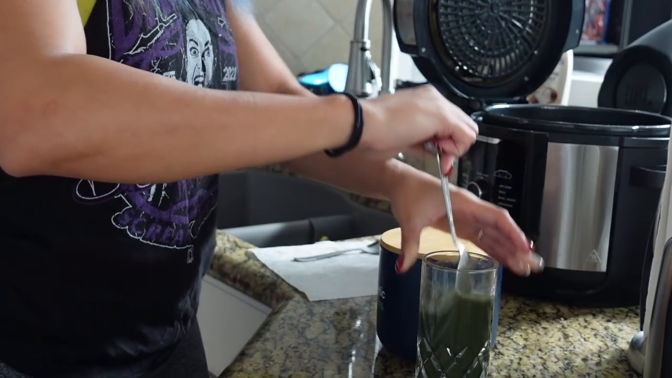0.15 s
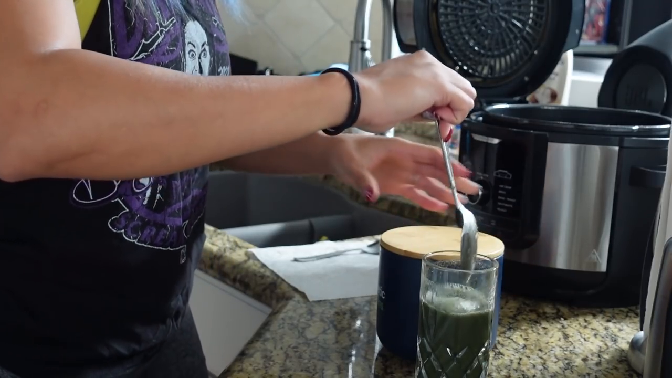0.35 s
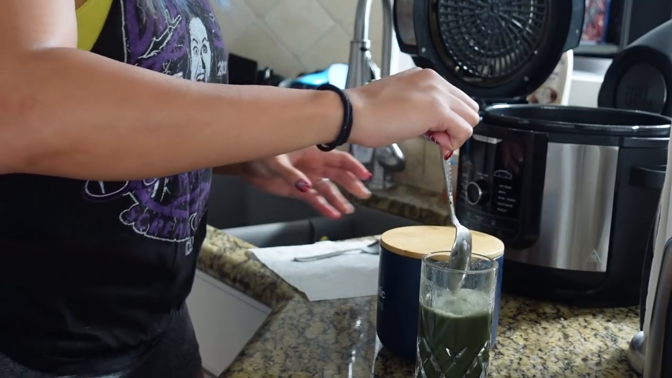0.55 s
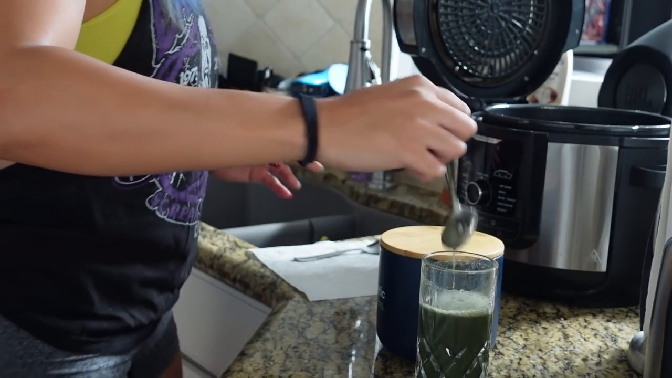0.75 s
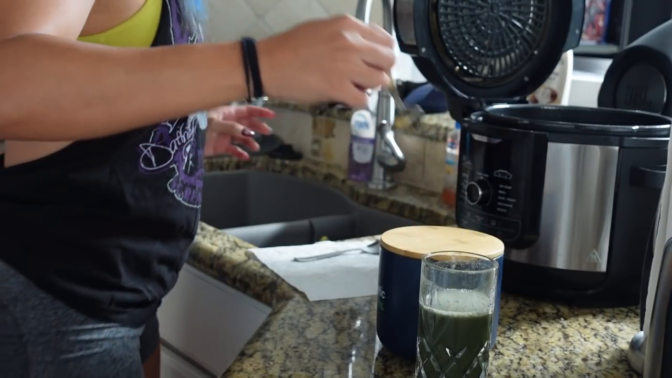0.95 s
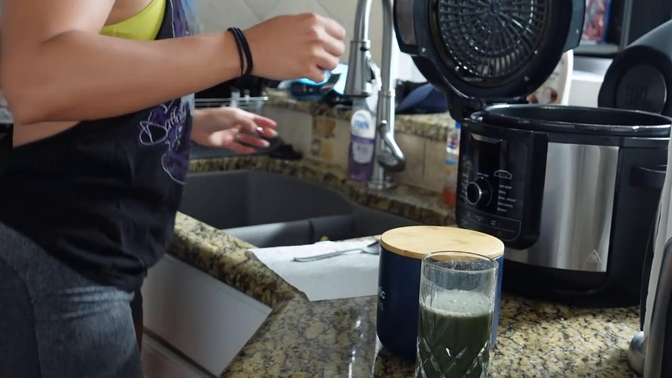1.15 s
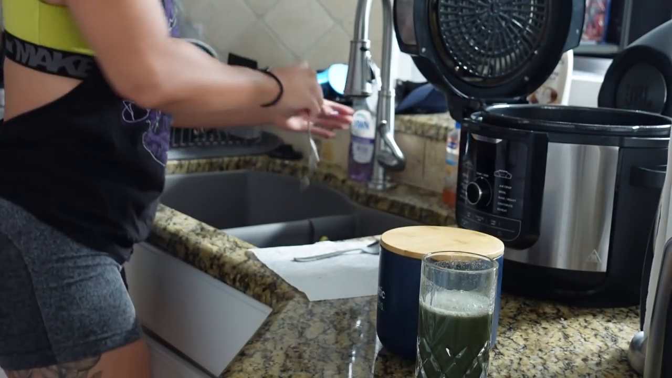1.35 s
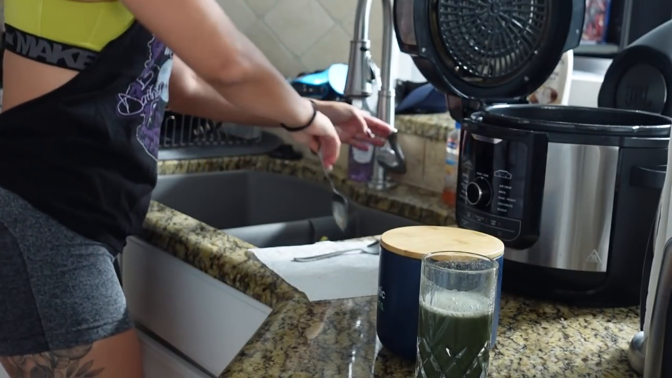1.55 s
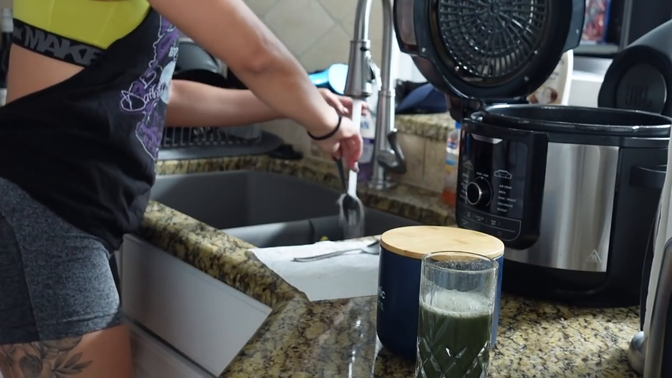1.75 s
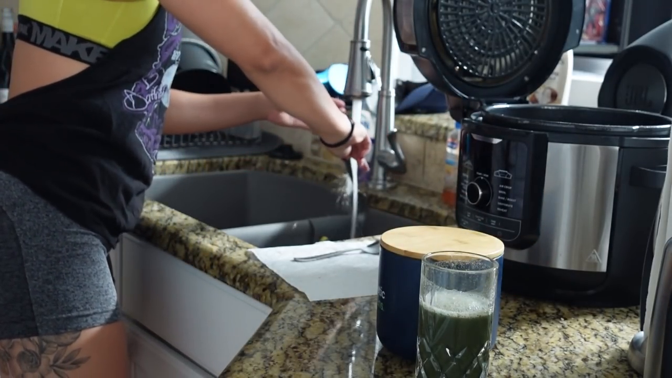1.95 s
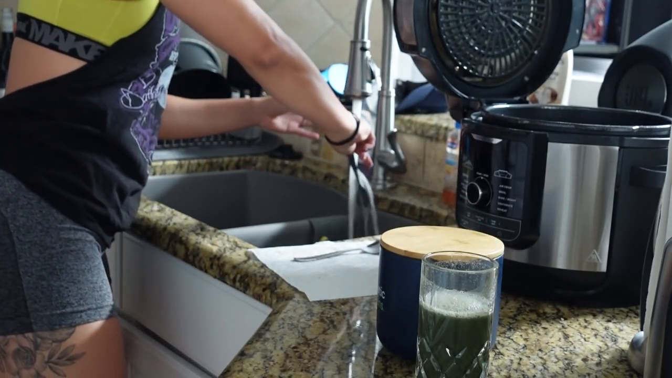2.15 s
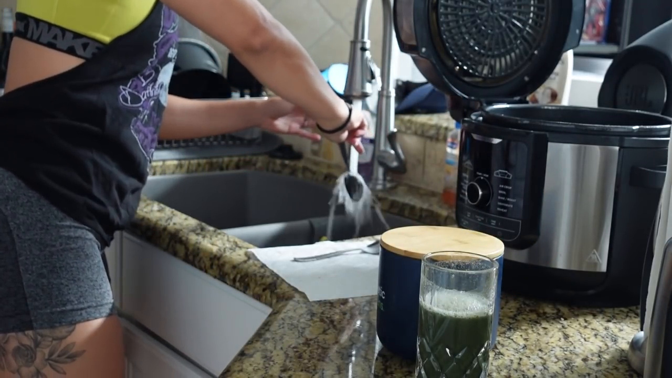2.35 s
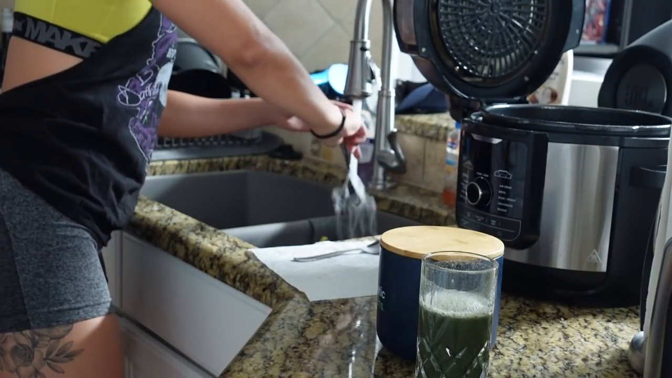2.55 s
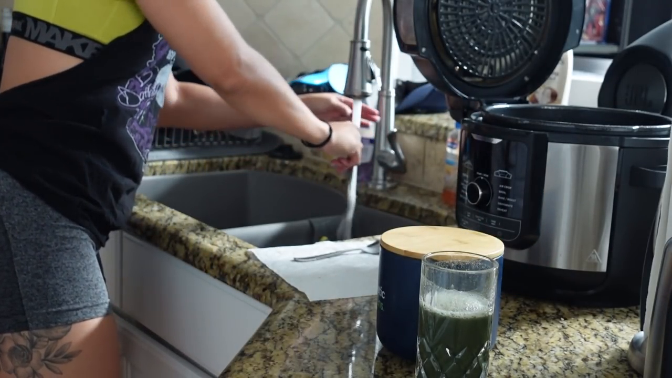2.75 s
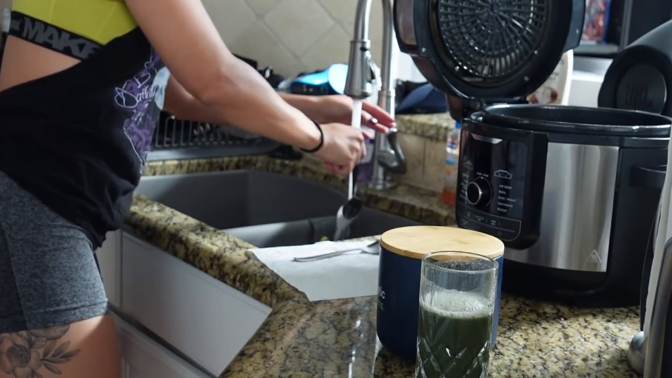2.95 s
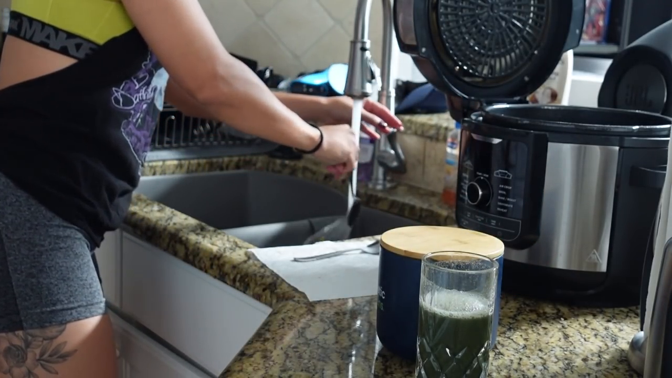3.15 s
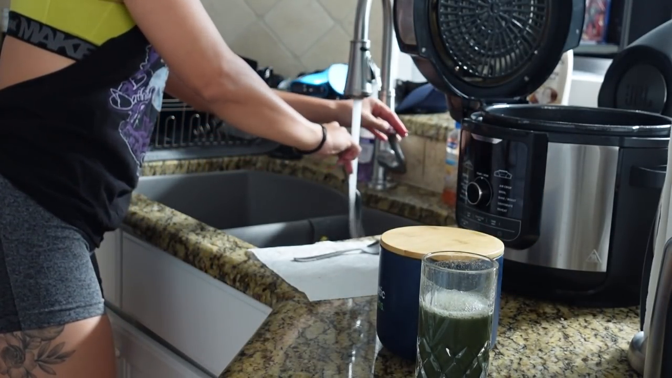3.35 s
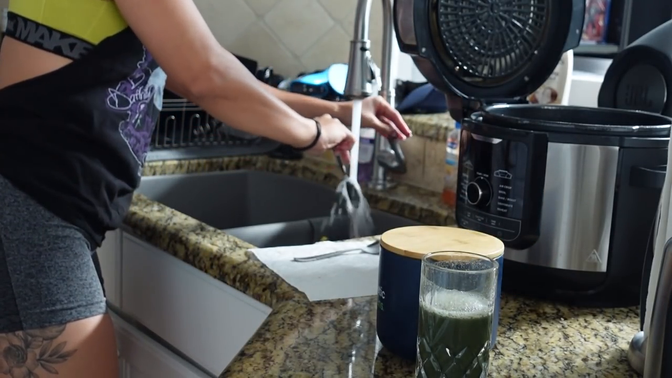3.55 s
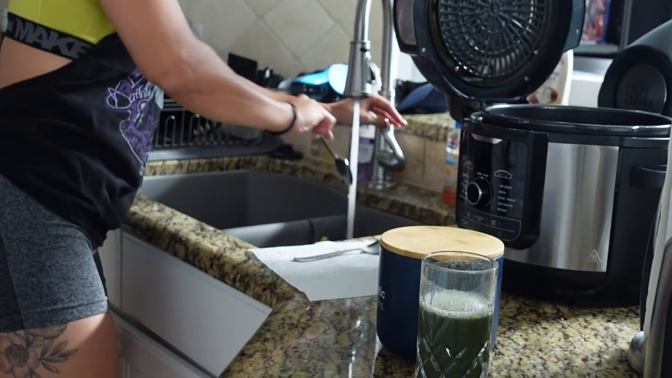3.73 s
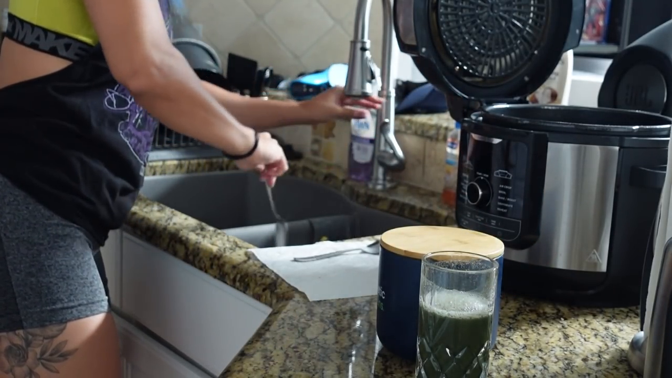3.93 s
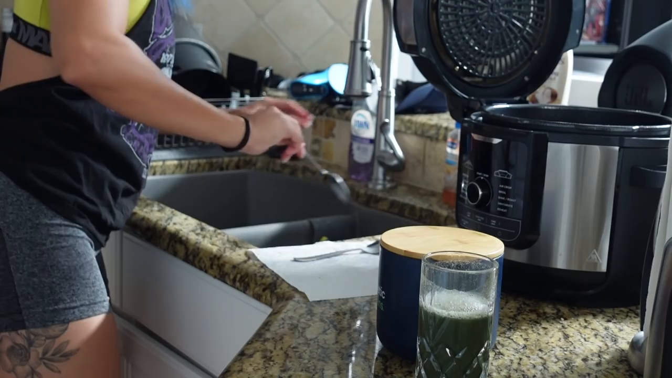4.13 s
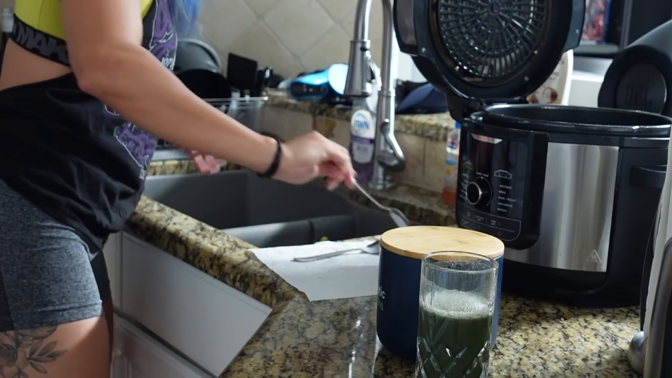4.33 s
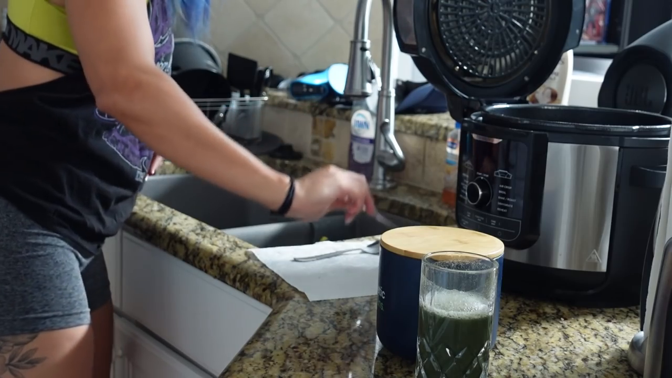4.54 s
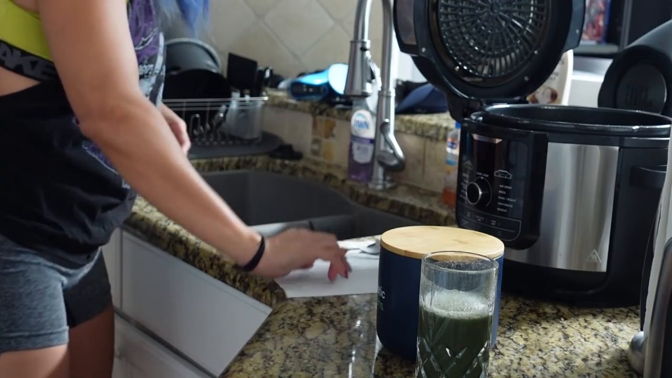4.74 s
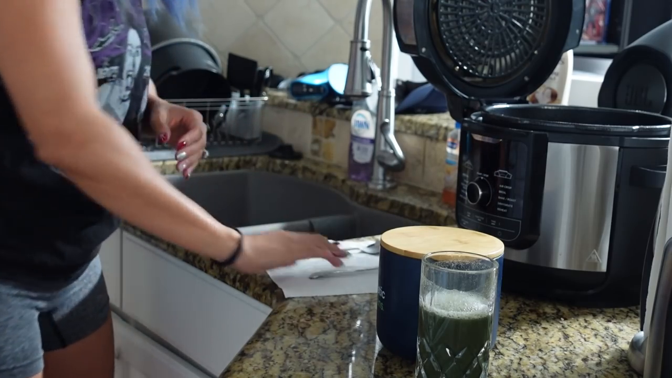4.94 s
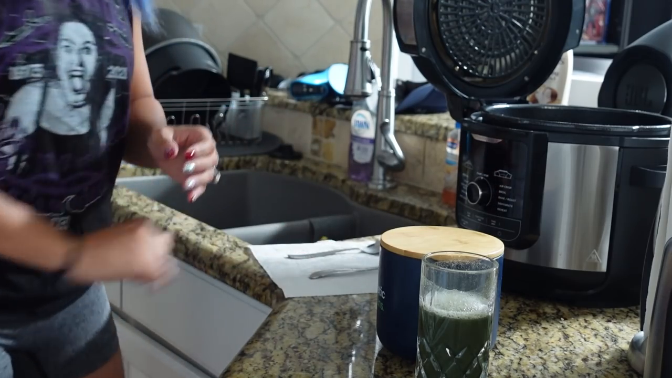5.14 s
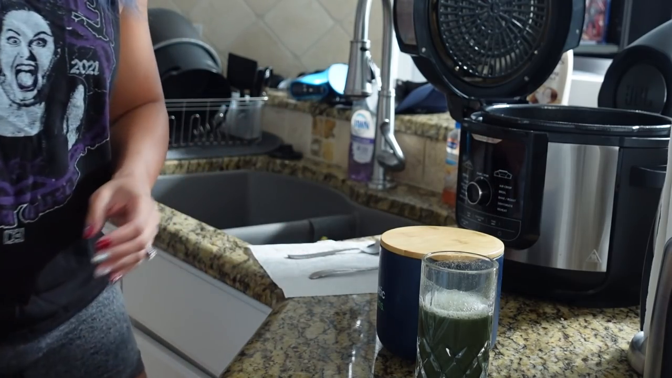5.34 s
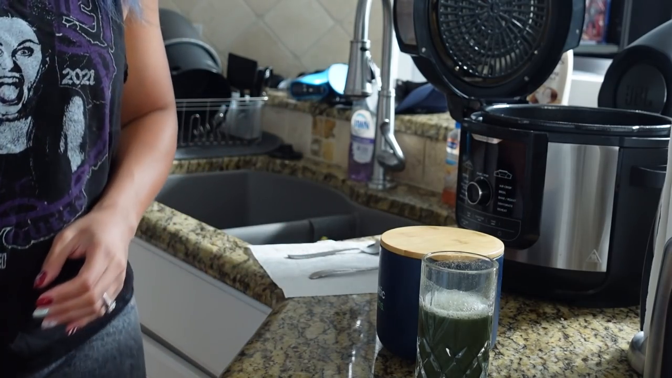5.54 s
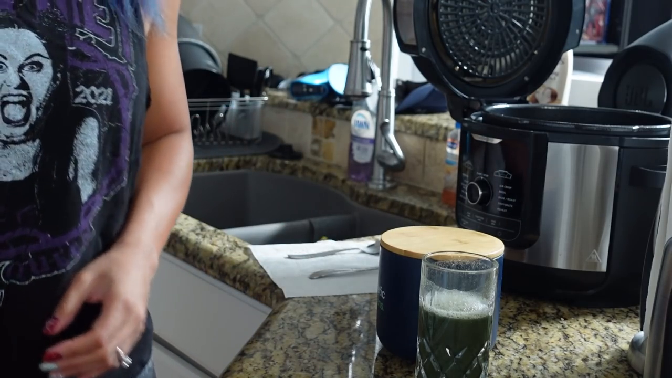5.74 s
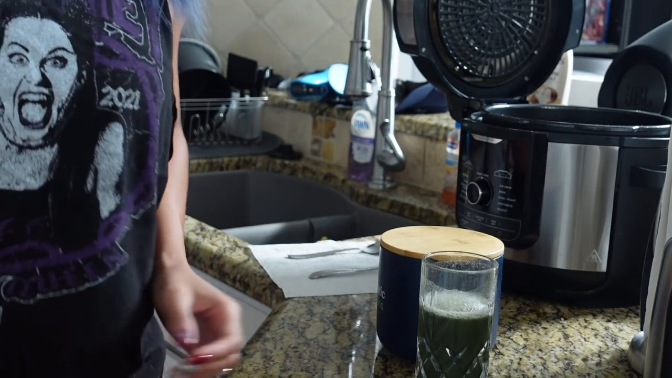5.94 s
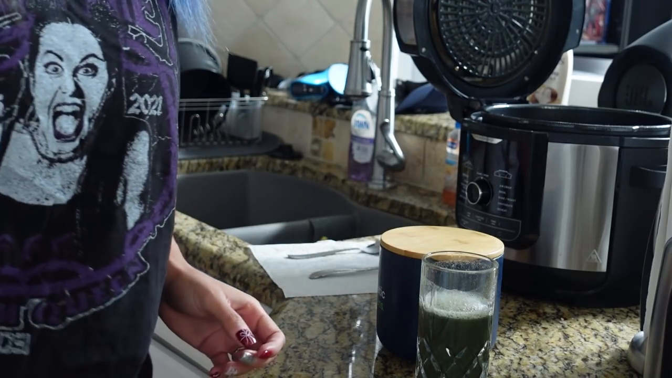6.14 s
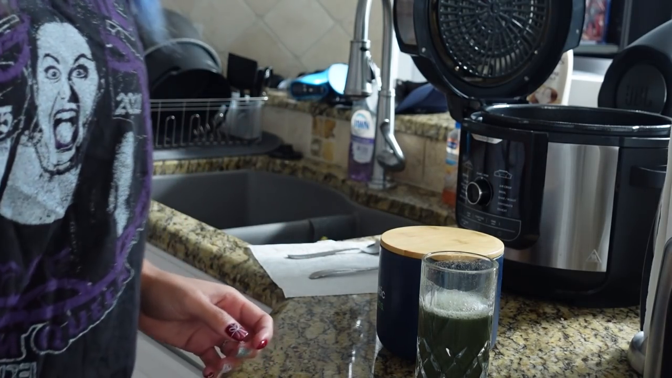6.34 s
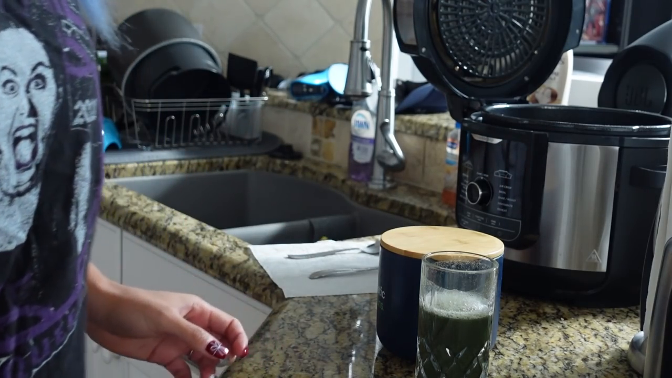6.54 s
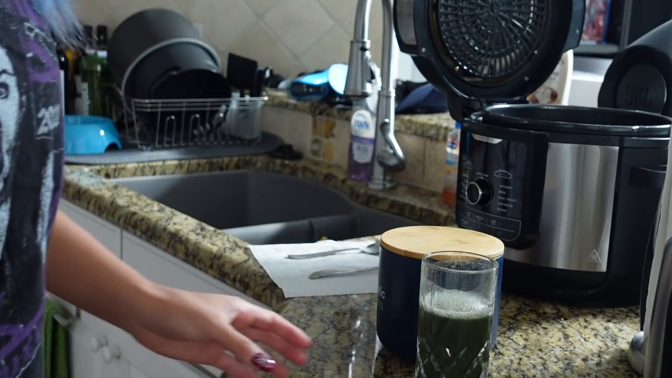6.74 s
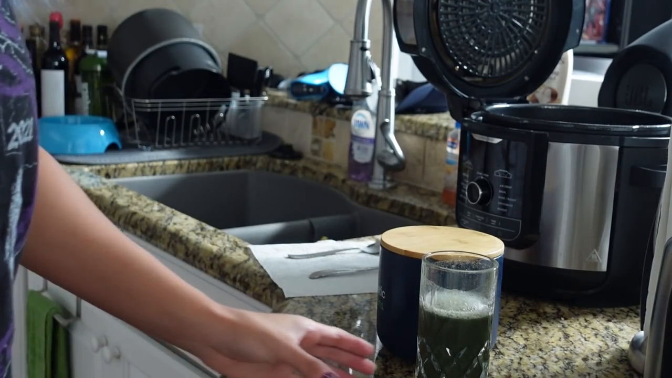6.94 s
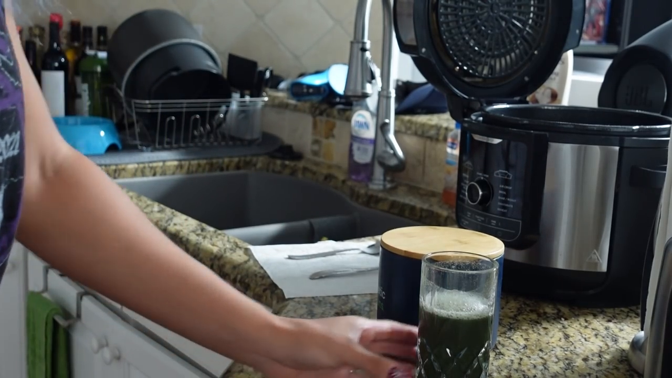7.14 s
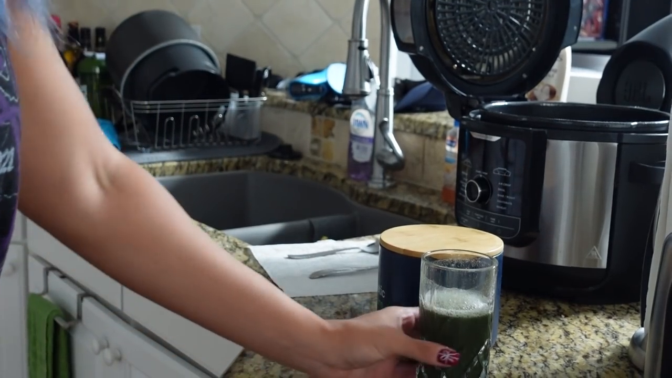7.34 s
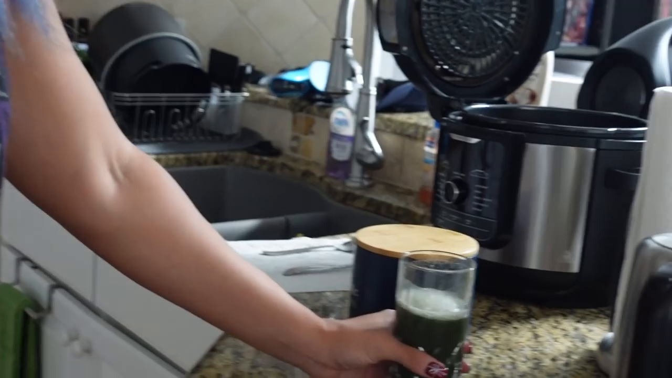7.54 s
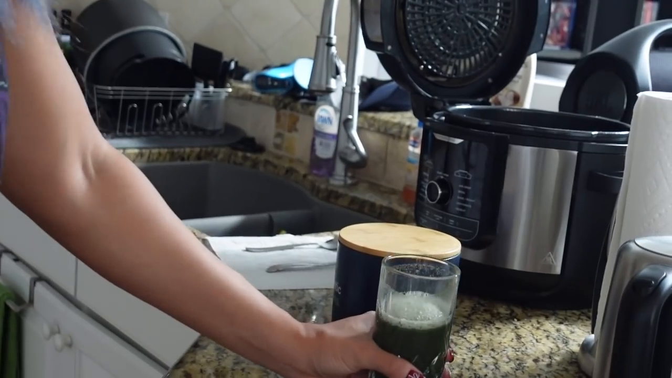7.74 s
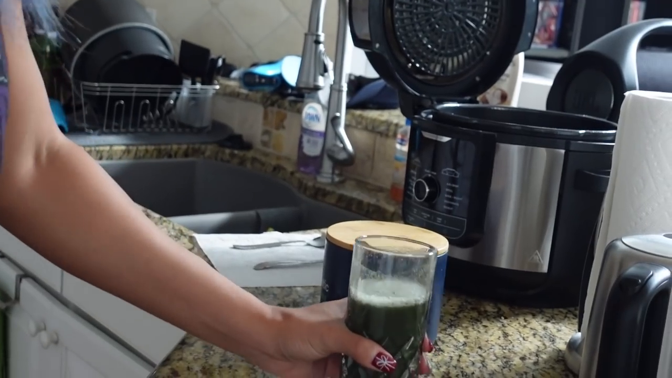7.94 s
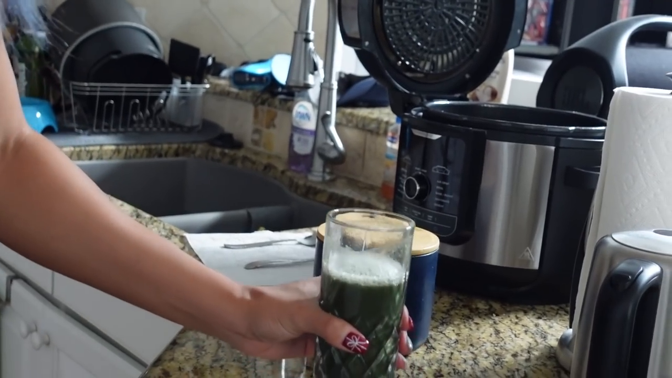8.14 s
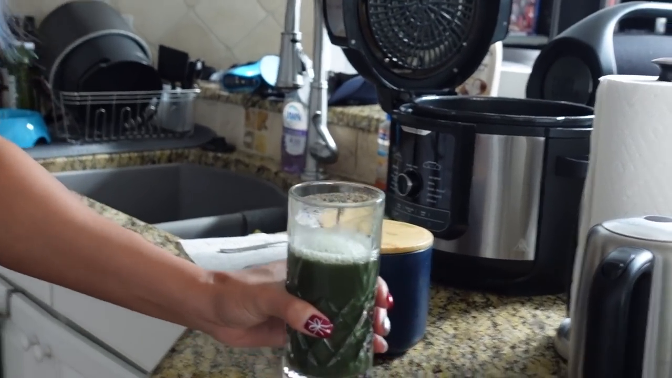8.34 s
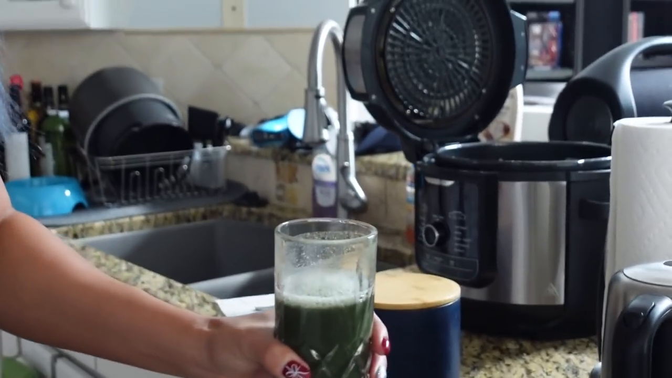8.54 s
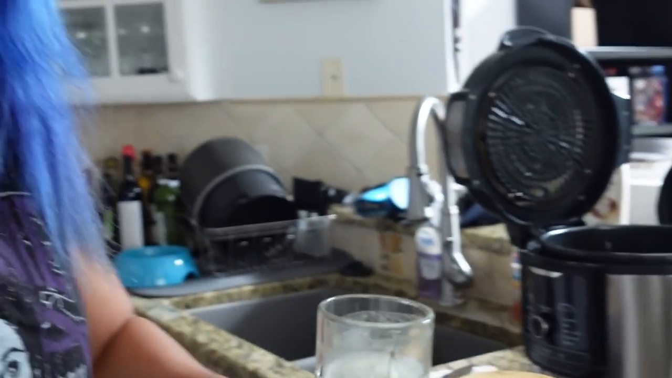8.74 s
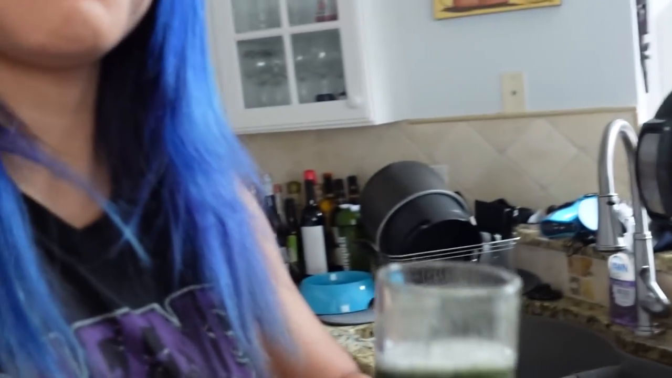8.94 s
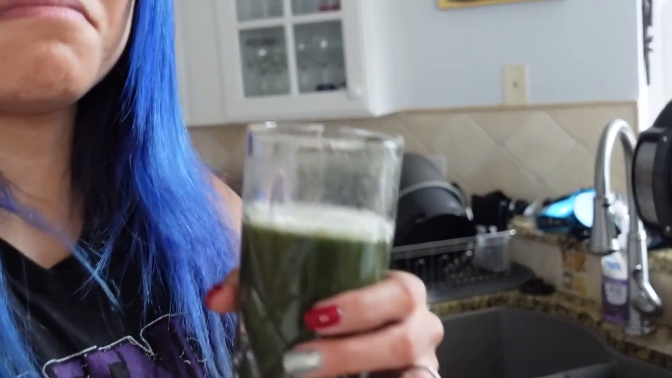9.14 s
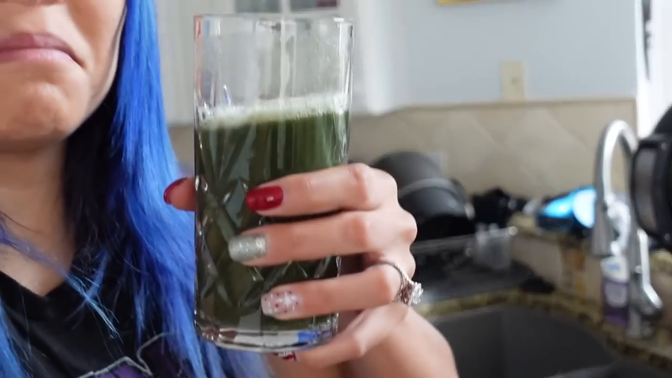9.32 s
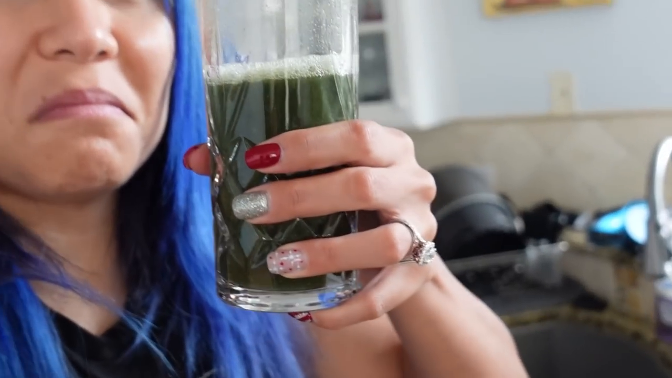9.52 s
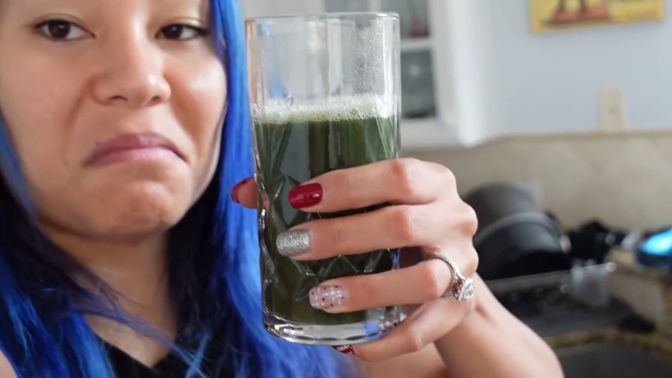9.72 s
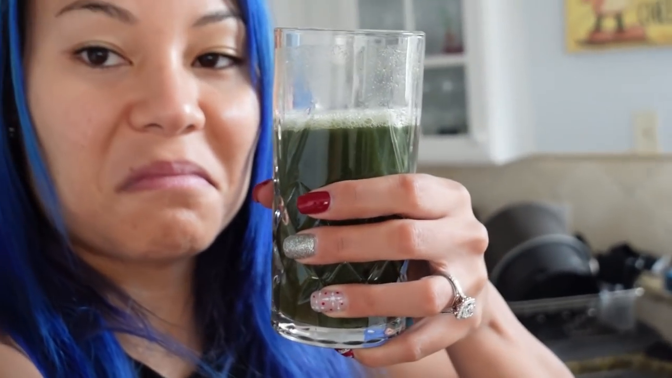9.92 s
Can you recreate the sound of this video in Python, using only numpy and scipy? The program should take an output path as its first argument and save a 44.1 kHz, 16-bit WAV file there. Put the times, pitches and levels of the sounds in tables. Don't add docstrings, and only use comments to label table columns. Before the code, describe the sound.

A spoon clinks three times on a full glass rim, a kitchen tap sprays over it, then it is tapped and laid on the counter.

```python
import sys
import numpy as np
from scipy import signal
from scipy.fft import rfft, irfft
from scipy.io import wavfile
from scipy.ndimage import uniform_filter1d

SR = 44100
rng = np.random.default_rng(int(sys.argv[2]) if len(sys.argv) > 2 else 0)


def inscribe(sig):
    pcm = np.round(np.clip(np.atleast_2d(sig).T, -1, 1) * 32767)
    wavfile.write(sys.argv[1], SR, pcm.astype(np.int16))


def gain_from_db(level_db):
    decades = np.asarray(level_db, float) / 20
    return 10 ** decades


N = 440115
LEAD = 4410
HZ = np.fft.rfftfreq(512, 1 / SR)

# pitch_hz, level_db (per Hz)
FLOOR = [(15, -87), (25, -66), (50, -28), (76, -12), (153, -11.5), (263, -10), (451, -11), (641, -6),
         (695, -11.5), (1330, -12.5), (2500, -18.5), (5730, -24), (10000, -26.5), (16000, -31)]
# start_s, pitch_hz
MOTOR = [(-.2, 98), (1.57, 94.6), (5.4, 91), (8.0, 90.9), (8.7, 92.3), (10.1, 89.5)]
IDLE_DB = [-99, -99.5, -89.5]
# start_s, end_s, order1_db, order2_db, order3_db
SPELLS = [
    (0.945, 2.1, -77.5, -70, -84),
    (5.552, 6.342, -86.5, -89, -91.5),
    (6.999, 8.202, -89, -91.5, -98.5),
    (8.198, 10.106, -85.5, -96.5, -84),
]

# peak_s, level_db, rise_s, fall_s
GRIP = [(6.9, -69, 9.8, 1.9), (7.45, -57.5, 0.47, 0.73), (7.68, -54.5, 0.043, 0.2),
        (8.14, -66.5, 0.048, .07), (8.54, -58, 0.38, 0.28), (8.91, -61.5, 0.039, 0.41),
        (9.38, -61, 0.033, 0.18), (9.46, -69, .3, 0.543), (9.98, -64, 0.099, .11)]
# start_s, peak_db, pitch_hz, length_s
CREAKS = [(7.49, -61.5, 610, 0.018), (7.685, -50, 613, 0.019), (7.702, -58, 594, 0.017),
          (9.243, -49, 645, 0.013), (9.27, -56, 631, 0.053), (9.278, -41.5, 621, 0.02),
          (9.321, -52.5, 607, 0.016), (9.338, -56.5, 610, 0.018), (9.378, -41, 622, 0.017),
          (9.403, -50.5, 600, 0.013)]

# peak_s, level_db, rise_s, fall_s
RUSTLES = [(4.262, -57.5, 0.042, 0.27), (5.12, -58, 0.044, 0.72), (7.174, -62.5, 0.054, 0.6),
           (7.878, -63.5, 0.09, .065)]
# pitch_hz, level_db (per Hz)
CLOTH = [(2500, -28.5), (4000, 2), (5300, 3.5), (7000, 1), (12000, -2.5), (16000, -3)]
# peak_s, hiss_db, length_s, low_part_db, top_part_db
SCUFFS = [(1.137, -50, 0.09, -14, -17), (1.277, -42, 0.19, -21, -9), (1.355, -50.5, 0.4, -24, 9.5),
          (5.625, -58.5, 0.043, 12, -8.5), (5.688, -36.5, 0.12, -20, -15), (5.735, -41, 0.15, -18.5, -4),
          (5.942, -57.5, 0.24, -12.5, 5), (6.188, -51, 0.24, -13.5, 6), (6.275, -43, 0.069, -13, 0),
          (6.589, -52.5, 0.35, -30.5, -6), (8.109, -56, 0.071, -6.5, -13), (8.908, -45.5, 0.3, -30.5, -6.5)]
# pitch_hz, level_db (per Hz)
SOLE = [(180, -43), (300, -16), (593, -10), (1230, -7.5), (1460, -9), (1610, -2), (3400, -6.5),
        (7690, -9.5), (16000, -24)]

# start_s, level_db, spoon_in_stream (0-1)
FLOW = [(1.624, -38.5, 1), (1.74, -35, 1), (2.01, -25.5, 0.15), (2.11, -24, 1), (2.18, -27.5, 0.3),
        (2.42, -25, 1), (2.52, -26.5, 0.5), (2.62, -25.5, 0.45), (2.99, -27, 0.57), (3.23, -30.5, 1),
        (3.32, -34, 1), (3.34, -23.5, 0.65), (3.44, -26, 0.86), (3.58, -23.5, 0.89), (3.68, -27.5, 0.37),
        (3.84, -25, 0.84), (3.92, -24.5, 1), (4.04, -34.5, 0)]
# pitch_hz, level_db (per Hz)
SPRAY = [(410, -44), (700, -1.5), (971, -13), (1170, -18.5), (1460, -6.5), (2000, -3.5), (3500, -3.5),
         (6150, -1.5), (15000, 0.5), (16000, -18.5)]
# pitch_hz, level_db (per Hz)
DRUM = [(18, -85), (30, -49.5), (60, -19.5), (164, 5), (298, 1), (348, 3), (420, -5), (524, -1.5),
        (562, -14), (666, -13), (971, -5.5), (1150, -11.5), (1800, -4.5), (2340, -31.5), (3960, -120)]
# start_s, peak_db, pitch_hz
SPLASHES = [(1.841, -15, 7000), (1.947, -11.5, 4500), (1.979, -6, 6070), (2.017, -11, 3960),
            (2.081, -14, 6240), (2.1115, -10, 5640), (2.1676, -9.5, 6064), (2.233, -4.5, 6960),
            (2.3564, -15, 3650), (2.5479, -10.5, 4500), (2.728, -9.5, 5800), (2.7666, -10, 7390),
            (2.8354, -11.5, 7400), (2.8678, -11.5, 3800), (2.8881, -39.5, 3970), (3.0382, -12, 5330),
            (3.3366, -11.5, 6850), (3.5087, -18, 8730), (3.7098, -21.5, 4630), (3.752, -18, 3760),
            (3.9557, -8.5, 9900), (3.9799, -11, 6800), (4.0372, -12.5, 6400), (4.066, -18.5, 7700)]
# start_s, level_db, centre_hz, length_s
SLOSHES = [(2.073, -29, 3900, 0.037), (2.054, -34.5, 2730, 0.052), (2.171, -38.5, 3317, .03),
           (2.215, -34.5, 3580, .03), (2.354, -30.5, 3600, 0.032), (2.38, -34.5, 3230, 0.041),
           (2.366, -30, 8000, 0.036), (2.563, -35, 4250, 0.04), (2.814, -30, 3550, 0.028),
           (2.816, -32.5, 5600, 0.052), (2.887, -44, 4100, 0.018), (3.053, -32.5, 4060, 0.028),
           (3.079, -34.5, 3000, .03), (3.153, -35.5, 3740, 0.038), (1.84, -33.5, 11600, 0.025),
           (3.335, -32, 6600, 0.046), (3.505, -36, 5460, 0.057), (3.737, -34.5, 4100, 0.047),
           (3.865, -31, 8500, 0.079)]
# pitch_hz, level_db
GURGLE = (348, -56)
GURGLE_S = 2.25, 3.8

# start_s, peak_db, centre_hz, width_hz, pan_db (left minus right)
TAPS = [(1.599, -28.5, 1570, 1850, 2.5), (3.823, -26.5, 447, 700, -1), (3.824, -22.5, 2430, 1810, -1),
        (5.612, -46, 1270, 681, 0), (6.257, -50, 2240, 675, 1), (7.328, -57, 309, 249, 5.5),
        (7.346, -40, 1003, 800, -1), (8.118, -47, 1710, 500, -8), (8.118, -48, 2640, 502, -6),
        (8.118, -46, 565, 700, 7)]
# (pitch_hz, level_db per Hz)
BUMPS = [
    (-.06, -34.5, 0.0064, [(59, -76), (100, -41), (180, -41), (553, -13), (1420, 6.5), (3590, -13), (5980, -4), (11000, -44), (14300, -55.5), (22000, -120)]),
    (8.5401, -40, 0.0097, [(59, -59), (100, -34), (172, -0.5), (398, -15.5), (477, -0.5), (741, -69), (981, -12), (1270, -20), (1590, -11), (1860, -35), (4870, -22), (12000, -60), (15600, -78), (22000, -120)]),
]

# start_s, ring_db, knock_db, damping (factor on t60), pan_db (left minus right)
BLOWS = [
    (0.4761, -36.5, -16, 0.98, -0.4),
    (0.661, -35.5, -18.5, 0.29, 0.5),
    (.818, -38, -14, 0.65, -0.5),
    (4.625, -29.5, -14.5, 0.78, 0.5),
    (4.972, -25, -27.5, 0.74, 2.5),
]
STRUCK_ON = [0, 0, 0, 1, 2]
# rise_s, first_swing_db (over the ring), swing_length_s, spoon_db (over the glass),
# brightness_db (per octave)
CONTACTS = [(0.00014, 15.5, 0.0036, -10.5, -2.2), (0.00016, 16, 0.0044, -11, 1.5),
            (0.0003, 28, 0.003, 10.5, -0.5), (0.0008, 0.5, 0.006, 0.5, 1), (0.017, 20.5, 0.055, 1.5, 4)]
# delay_s, level_db
BOUNCES = [
    [(.0195, -7.5), (.068, -21), (.089, -14)],
    [(.021, -8.5)],
    [(.019, -18), (.026, -15), (.088, -22.5)],
    [(0.038, -11.5)],
    [],
]
# direct_db, lag_s (through the counter before the room answers)
PATHS = [(-9, .005), (3, .002), (-0.5, .004), (-1, .003), (3, .001)]
# pitch_hz, level_db (per Hz)
KNOCKS = [
    [(59, -70.5), (100, -22.5), (248, -0.5), (293, -7), (604, -2.5), (1170, -3), (2520, -6.5), (4980, -15),
     (6510, -16.5), (8520, -18.5), (14000, -28.5)],
    [(59, -54.5), (100, -20), (617, -3.5), (713, -8), (1030, -2.5), (2470, -7.5), (5300, -21.5),
     (6510, -9.5), (8520, -16.5), (9850, -21), (14000, -35.5)],
    [(59, -75), (100, -23), (346, -19), (534, -6), (713, -7.5), (1630, -7.5), (2570, -4.5), (4880, -13.5),
     (6510, -12), (8180, -17), (14000, -32.5)],
    [(59, -41.5), (110, -22.5), (824, -11.5), (1300, -9.5), (2870, -6), (3400, 1.5), (4500, -13),
     (6910, -4), (8000, -19), (10400, -14.5), (13000, -25.5), (15500, -25)],
    [(60, -18.5), (150, -17.5), (450, -10), (1500, -6.5), (3000, 1), (5000, -4.5), (8000, -16),
     (14000, -25.5)],
]
# pitch_hz, width_hz, level_db
NOTES = [
    [(662, 95, -9.5), (1186, 38, 2), (1430, 32, -4.5), (1880, 140, -4), (2370, 83, -3), (3660, 71, -9)],
    [(619, 90, -6), (800, 57, -1), (1180, 38, -3.5), (1650, 33, -5.5), (1850, 160, -7), (3970, 200, 2)],
    [(530, 50, 0), (976, 27, -4), (2000, 80, -7.5), (2430, 220, -6.5), (3620, 170, 2.5), (5190, 71, -8.5)],
    [(1324, 64, -4.5), (2250, 32, -7.5), (3710, 60, -0.5), (4480, 56, -13.5), (5330, 47, -8),
     (5600, 27, -0.5), (5880, 87, -10)],
    [(521.7, 71, -3), (1177, 25, 0)],
]

SPOON_HZ = [1160, 1665, 2277, 3731, 5490, 5636, 6785, 6985, 8678, 9120, 12350, 2923, 3045, 4253]
# t60_s (free), rim_db, tip_db, flat_db
SPOON = [(0.35, -40, -29.5, -28.5), (1, -46.5, -44, -12.5), (1.2, -44.5, -31.5, -10), (0.9, -16, -21, -4),
         (.75, -42, -16, -19), (.75, -30.5, -18.5, -18), (0.75, -20.5, -10.5, -9.5), (0.79, -42, -22, -19),
         (0.45, -42, -22, -21.5), (0.4, -26, -4, -10), (0.4, -32, -24, -22.5), (0.5, -40, -27.5, -28),
         (.45, -38.5, -18, -19.5), (0.24, -32, -36, -28.5)]
GLASS_HZ = [2515, 3960, 6410, 10165, 11590, 12600, 13860, 14465, 15300, 6310, 6650]
# t60_s (free), rim_db, tip_db, flat_db
GLASS = [(.2, -21, -43, -43), (0.43, -27.5, -25, -30), (0.15, -1.5, -32, -35.5), (0.68, -13.5, -16, -25.5),
         (0.35, -8.5, -23.5, -49.5), (.33, -13.5, -14.5, -27), (.31, -16.5, -17.5, -33),
         (.32, -19.5, -12, -26), (.1, -41.5, -25, -60.5), (.3, -14, -35, -37), (0.26, -4.5, -37.5, -44)]
TWIN_SPLIT = [.0052, .0014, .0052]
TWIN_SHARE = [.35, .75, .85]
WET_PITCH = [.984, 1, 1]
SPOON_HELD = [1.2, 0.89, 0.92]
GLASS_HELD = [0.94, 0.71, 0.86]
SWING_LOSS_DB = [0.4, 0.1, 8.5]
ROCK_DB = [1.5, 3, 3]

# pitch_hz, t60_s
KITCHEN = [(100, 0.46), (400, 0.51), (1500, 0.69), (4000, 0.56), (9000, 0.42), (16000, 0.27)]
# pitch_hz, side_minus_mid_db
WIDTH = [(60, -18), (180, -22.5), (550, -9.5), (1650, -10), (4970, -8), (15000, -5.5)]


def evened(x):
    return x / np.sqrt(np.mean(x ** 2) + 1e-20)


def noise(n):
    return rng.standard_normal(n)


def timeline():
    return np.arange(N + LEAD) / SR - LEAD / SR


def read(points, hz):
    f, value = np.transpose(points)
    return np.interp(np.log(hz + 1), np.log(f + 1), value)


def follow(rows, t, off=-120):
    s, *columns = np.transpose(rows)
    return [np.interp(t, s, c, off, off) for c in columns]


def panned(x, db):
    return np.array([x * gain_from_db(db / 2), x * gain_from_db(-db / 2)])


def add(mix, s, sound):
    part = mix[:, LEAD + round(s * SR):][:, :sound.shape[1]]
    part += sound[:, :part.shape[1]]


def resonate(x, hz, width):
    turn = np.exp(2j * np.pi * np.cumsum(hz * np.ones(len(x))) / SR)
    r = np.exp(-np.pi * width / SR)
    return 2 * (turn * signal.lfilter([1 - r], [1, -r], x / turn)).real


def coloured(x, points):
    db = read(points, abs(np.fft.fftfreq(4096, 1 / SR)))
    log_gain = np.log(gain_from_db(np.maximum(db, -90)))
    taps = np.fft.ifft(np.exp(np.conj(signal.hilbert(log_gain)))).real[:2048]
    return signal.oaconvolve(x, taps / np.linalg.norm(taps))[:len(x)]


def unit(points):
    db = read(points, HZ)[:, None]
    return db - 10 * np.log10(np.mean(gain_from_db(2 * db)))


def swell(t, s, db, rise, fall, bend):
    return np.maximum(db - 20 * (abs(t - s) / np.where(t < s, rise, fall)) ** bend, -120)


def within(t, start, end):
    return np.clip(np.minimum(t - start, end - t) / 0.16, 0, 1)


def hiss(field_db, patchy_db, flicker_db):
    t = np.arange((N + LEAD) // 128 + 5) * 128 / SR - LEAD / SR
    a, b, patches = rng.standard_normal((len(t), len(HZ), 3)).T
    patches = uniform_filter1d(patches, size=24, axis=0)
    patches = evened(uniform_filter1d(patches, size=6, axis=1))
    flicker = evened(uniform_filter1d(noise(len(t)), size=3))
    z = (a + 1j * b) * gain_from_db(field_db(t) + patchy_db * patches + flicker_db * flicker)
    return signal.istft(z, nperseg=512, noverlap=384)[1][:N + LEAD] / np.sqrt(6 * len(HZ))


def background():
    t = timeline()
    mid, side = (evened(coloured(noise(len(t)), FLOOR)) for _ in range(2))
    side = gain_from_db(1.5) * signal.lfilter([1, -1], [1, -.96], side)
    turns = np.cumsum(follow(MOTOR, t)[0]) / SR
    orders = gain_from_db(IDLE_DB)[:, None]
    for start, end, *db in SPELLS:
        orders = orders + gain_from_db(db)[:, None] * within(t, start, end)
    tones = gain_from_db(-83.5) * evened(resonate(noise(len(t)), 9420, 45))
    for k, level in enumerate(orders):
        tones += level * np.sqrt(2) * np.sin(2 * np.pi * (k + 1) * turns)
    return gain_from_db(-62.5 - 6.0) * np.array([mid + side, mid - side]) + tones


def camera_shell():
    t = timeline()
    grip_db = np.max([swell(t, *row, 1) for row in GRIP], axis=0)
    hz = np.interp(grip_db, [-70, -60], [668, 615])
    rub = resonate(resonate(noise(len(t)), hz, 140), hz, 140)
    mix = panned(gain_from_db(grip_db - 5.5) * evened(rub), 8.3)
    for s, peak_db, hz, length in CREAKS:
        u = np.arange(round(4 * length * SR)) / SR / length
        creak = np.e * 3 * u * np.exp(-3 * u) * np.sin(2 * np.pi * hz * u * length)
        add(mix, s - .004, panned(gain_from_db(peak_db) * creak, 14.6))
    return mix


def clothes():
    def field_db(t):
        return np.max([swell(t, *row, 0.96) for row in RUSTLES], axis=0) + 3 + unit(CLOTH)
    return panned(hiss(field_db, patchy_db=1.51, flicker_db=1.5), 0.63)


def slippers():
    rise_share, bend = 0.45, 1.87

    def field_db(t):
        low = 1 / (1 + (HZ[:, None] / 2200) ** 4)
        top = 1 / (1 + (8500 / (HZ[:, None] + 1)) ** 4)
        steps = []
        for s, db, length, low_db, top_db in SCUFFS:
            slide_db = swell(t, s, db, rise_share * length, (1 - rise_share) * length, bend)
            steps.append(slide_db + low * (low_db + 12.0) + top * (top_db + 2.5))
        return np.max(steps, axis=0) + 5.23 + unit(SOLE)
    return panned(hiss(field_db, patchy_db=1.2, flicker_db=.8), 4.5)


def tap_flow():
    start, end = FLOW[0][0], FLOW[-1][0]
    air = [(start - .022, -50, 1), (start - .2 * .022, -45, 1)]
    last_drops = [(end + 0.072, -71, 0), (end + 0.21, -71, 0)]
    return air + list(FLOW) + last_drops


def spray(flow_db, spoon):
    free_hz, spoon_hz = 6400, 4630

    def field_db(t):
        level_db, dipped = follow(tap_flow(), t)
        centre_hz = free_hz + (spoon_hz - free_hz) * np.clip(dipped, 0, 1)
        hump = np.exp(-.5 * (np.log(HZ[:, None] / centre_hz + 1e-3) / 0.77) ** 2)
        return level_db - 3.5 + unit(SPRAY) + 9.7 * hump
    out = hiss(field_db, patchy_db=1.9, flicker_db=1.3)
    n = len(out)
    drops = gain_from_db(4.2 * np.minimum(rng.exponential(1, n), 4))
    drops = drops * (rng.random(n) < 4000 / SR) * rng.choice([-1, 1], n)
    return out + gain_from_db(flow_db - 13.0) * evened(coloured(drops, SPRAY))


def basin(t, flow_db, spoon, lumpy):
    drum = coloured(noise(len(t)), DRUM) * gain_from_db(2.4 * lumpy)
    boom = signal.sosfiltfilt(signal.butter(2, 330, fs=SR, output="sos"), drum)
    bowl_hz = 938 + (1044 - 938) * spoon - 87 * (t - FLOW[0][0])
    hollow = evened(resonate(drum - boom, bowl_hz, 76))
    patter = 0.91 * evened(drum - boom) + 0.56 * hollow
    lag = round(0.019 * SR)
    boom_level = uniform_filter1d(gain_from_db(flow_db - 16.5 - 17.5 * spoon), lag, origin=lag // 2 - 1)
    return boom_level * evened(boom) + gain_from_db(flow_db - 36 + 14.5 * spoon) * patter


def drain(t, lumpy):
    hz, db = GURGLE
    hz = hz + 12 * evened(uniform_filter1d(lumpy, size=4000))
    return gain_from_db(db + 2.5) * within(t, *GURGLE_S) * evened(resonate(noise(len(t)), hz, 2.6))


def splash(peak_db, hz):
    u = np.arange(3000) / SR
    burst = evened(resonate(resonate(noise(len(u)), hz, 0.43 * hz), hz, 0.5 * hz))
    burst = burst * np.exp(-u * hz / 55.5) * (1 - np.exp(-u / 0.001424))
    return panned(gain_from_db(peak_db - 12.5) * burst, 0.88)


def slosh(db, hz, length):
    u = np.arange(round(3 * length * SR)) / SR / length
    uneven = evened(uniform_filter1d(noise(len(u)), size=150))
    spits = noise(len(u)) * gain_from_db(3.5 * uneven)
    body = evened(resonate(resonate(spits, hz, 0.34 * hz), hz, 0.47 * hz))
    return panned(gain_from_db(db) * body * 3 * u * np.exp(1 - 3 * u), 0.9)


def water():
    t = timeline()
    flow_db, spoon = follow(tap_flow(), t)
    spoon = np.clip(spoon, 0, 1)
    lumpy = evened(uniform_filter1d(noise(len(t)), size=1500))
    stream = spray(flow_db, spoon) + basin(t, flow_db, spoon, lumpy) + drain(t, lumpy)
    mix = panned(stream, 1.15)
    for s, *row in SPLASHES:
        add(mix, s, splash(*row))
    for s, *row in SLOSHES:
        add(mix, s, slosh(*row))
    return mix


def tap(peak_db, hz, width, pan_db, decay):
    push = noise(2000) * signal.windows.tukey(4000, .01)[:2000] * np.exp(-np.arange(2000) / SR / decay)
    body = resonate(resonate(resonate(push, hz, width), hz, width), hz, width)
    return panned(gain_from_db(peak_db - 4.0) * body / abs(body).max(), pan_db)


def kitchen(x):
    taps = np.zeros((2, SR))
    at = np.arange(130, SR - 20, 20) + rng.integers(0, 20, (2, (SR - 131) // 20))
    np.put_along_axis(taps, at, rng.choice([-1., 1.], at.shape), 1)
    taps *= (1 - np.exp(-np.arange(SR) / SR / 0.00081)) ** 2
    hz, t, z = signal.stft(taps, SR, nperseg=256)
    z[1] *= gain_from_db(read(WIDTH, hz) + 1.5)[:, None]
    z = z * gain_from_db(-60 * t / read(KITCHEN, hz)[:, None])
    mid, side = signal.istft(z, SR, nperseg=256)[1]
    tail = np.array([mid + side, mid - side]) / np.linalg.norm(mid)
    return signal.fftconvolve(x, tail, axes=1)[:, :x.shape[1]]


def knock(db, rise, length, colour):
    t = np.arange(SR // 5) / SR
    burst = rfft(noise(len(t)) * (1 - np.exp(-t / rise)) * np.exp(-t / length))
    smooth = np.sqrt(uniform_filter1d(abs(burst) ** 2, size=25))
    push = irfft(burst / smooth, len(t)) * np.exp(-t / (3 * length))
    return gain_from_db(db) * np.sqrt(length * SR / 2) * coloured(push / np.linalg.norm(push), colour)


def ring(db, damping, rise, first_db, length, spoon_db, bright_db, struck_on):
    t = np.arange(SR * 4 // 5) / SR
    onset = (1 - np.exp(-t / rise)) ** 2
    first = onset * np.exp(-(t / length) ** 2)
    out = np.zeros(len(t))
    modes = list(zip(list(SPOON_HZ) + list(GLASS_HZ), list(SPOON) + list(GLASS)))
    for k, (hz, (t60, *drive_db)) in enumerate(modes):
        phase, split = rng.random(2)
        spoon = k < len(SPOON)
        hz = hz * (WET_PITCH[struck_on] if spoon else 1)
        t60 = t60 * (SPOON_HELD if spoon else GLASS_HELD)[struck_on]
        twin_hz = hz * (1 + TWIN_SPLIT[struck_on] * (1 if spoon else 1 + split))
        swing = onset
        if struck_on > 0 or not spoon:
            octaves = abs(np.log2(hz / 3731))
            swing = onset + gain_from_db(first_db - SWING_LOSS_DB[struck_on] * octaves) * first
        pair = swing * np.sin(2 * np.pi * (hz * t + phase))
        pair += onset * np.sin(2 * np.pi * (twin_hz * t + phase)) * TWIN_SHARE[struck_on]
        rocking = np.sin(2 * np.pi * (6 * (1 + split) * t + phase))
        rocking += np.sin(2 * np.pi * (6 * (4.2 + phase) * t + split))
        pair *= gain_from_db(ROCK_DB[struck_on] * rocking * np.minimum(t / .1, 1))
        level_db = drive_db[struck_on] + spoon_db * spoon + bright_db * np.log2(hz / 6400)
        out += gain_from_db(level_db - 60 * t / (damping * t60)) * pair
    return gain_from_db(db) * out


def scene():
    rings, knocks, direct, near, laid = np.zeros((5, 2, N + LEAD))
    blows = zip(BLOWS, CONTACTS, STRUCK_ON, KNOCKS, BOUNCES, PATHS, NOTES)
    for blow, (rise, *choke), struck_on, colour, bounces, (direct_db, lag), notes in blows:
        s, ring_db, knock_db, damping, pan_db = blow
        for delay, db in [(0.00061, 0)] + list(bounces):
            at = s + delay
            tone = ring(ring_db + db, damping, rise, *choke, struck_on)
            add(laid if struck_on == 2 else rings, at, panned(tone, pan_db))
            thud = knock(knock_db - 4.5 + db, rise, rise + 0.0028, colour)
            body = sum(gain_from_db(note_db + 8.0) * resonate(thud, hz, width) for hz, width, note_db in notes)
            thud = panned(thud + body, pan_db)
            add(direct, at, gain_from_db(direct_db) * thud)
            add(knocks, at + lag, thud)
    for mix, (s, db, length, colour) in zip((knocks, near), BUMPS):
        add(mix, s, panned(knock(db, 0.0008, length, colour), -0.73))
    for s, *row in TAPS:
        if s > 6.2:
            add(near, s, tap(*row, decay=0.0055))
        else:
            add(rings, s, tap(*row, decay=0.014))
    wash = gain_from_db(-0.5) * (water() + slippers() + clothes())
    sent = gain_from_db(-3.5) * rings + gain_from_db(-0.5) * knocks + gain_from_db(-4.5) * wash + gain_from_db(-7.0) * near
    sent += gain_from_db(-15) * laid
    dry_sounds = rings + direct + wash + near + laid
    return (dry_sounds + kitchen(sent) + camera_shell() + background())[:, LEAD:]


def low_pass(x):
    return signal.sosfilt(signal.butter(12, 16970, fs=SR, output="sos"), x)


def record(dry):
    cut = signal.sosfilt(signal.butter(3, 85, "high", fs=SR, output="sos"), dry)
    band_limit = signal.firwin(255, 16000, window=("kaiser", 7), fs=SR)
    cut = signal.oaconvolve(cut, band_limit[None], "same")
    return low_pass(cut)


dry = scene()
out = record(dry)
inscribe(out)
```